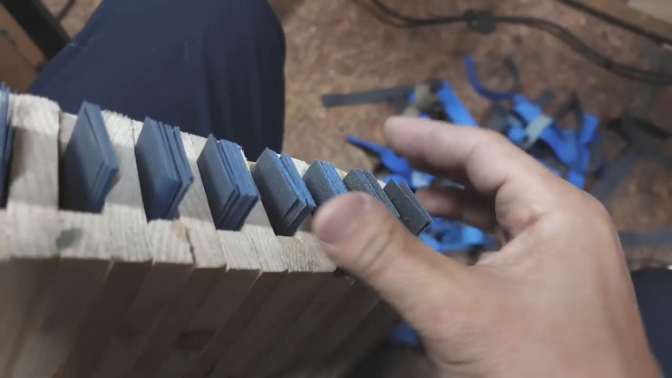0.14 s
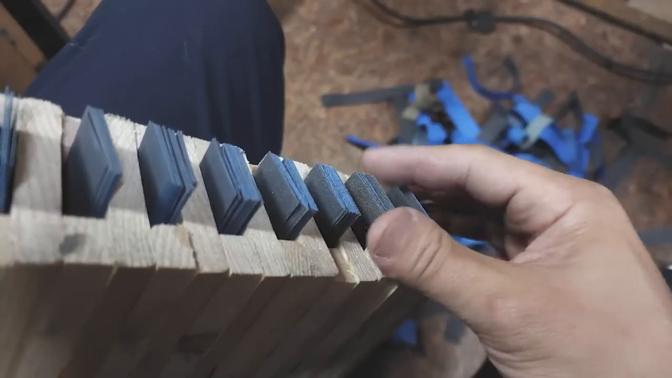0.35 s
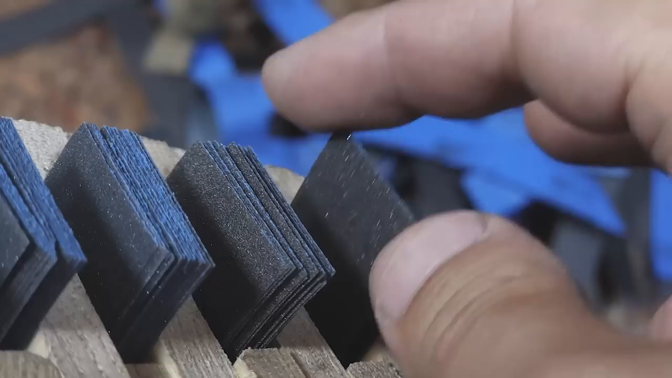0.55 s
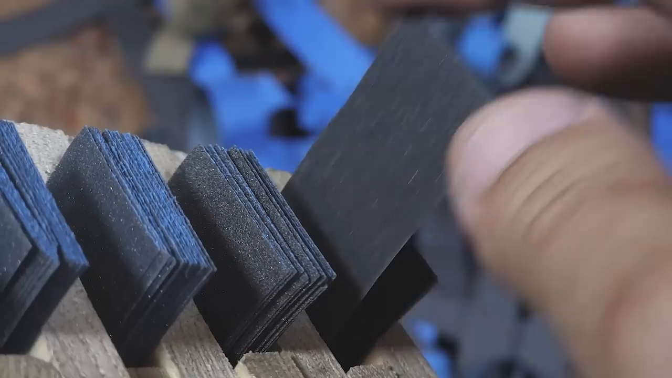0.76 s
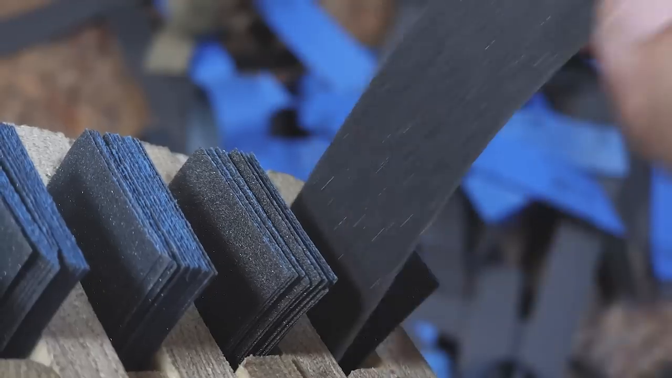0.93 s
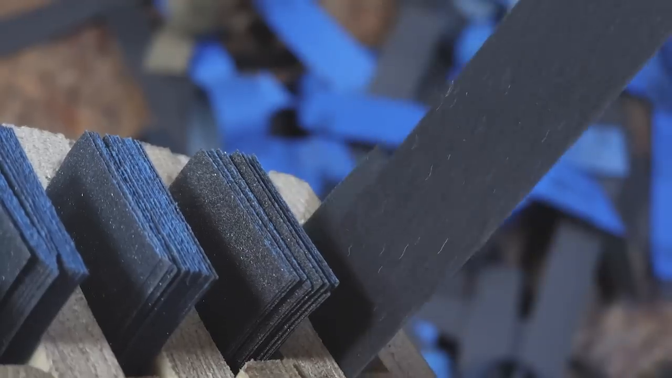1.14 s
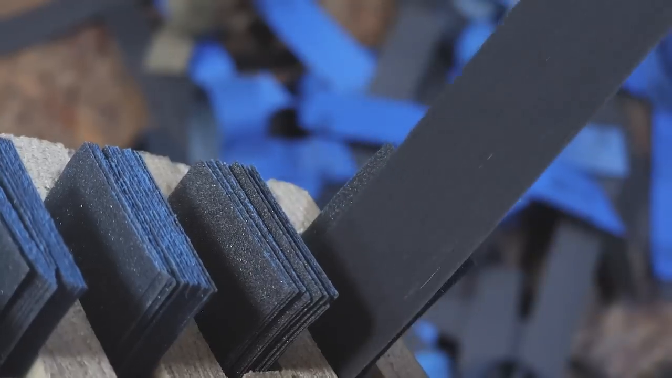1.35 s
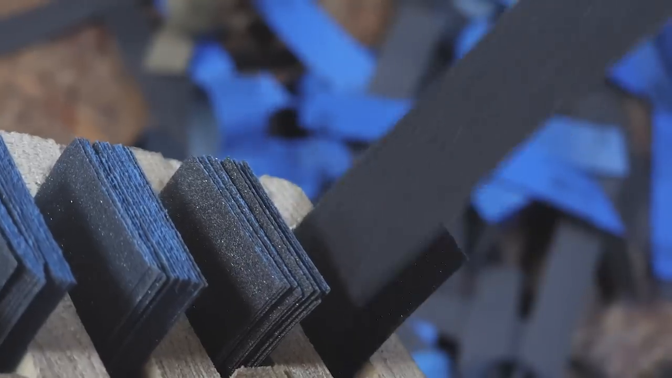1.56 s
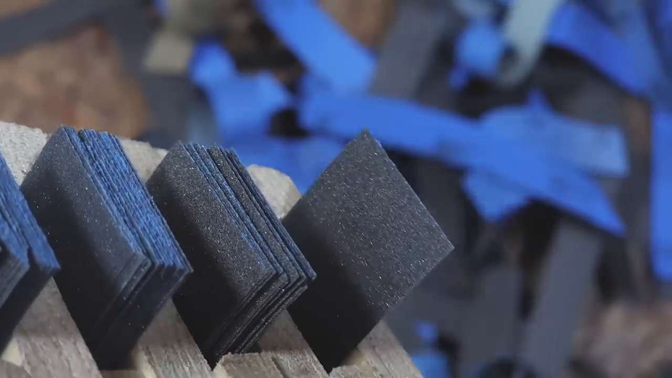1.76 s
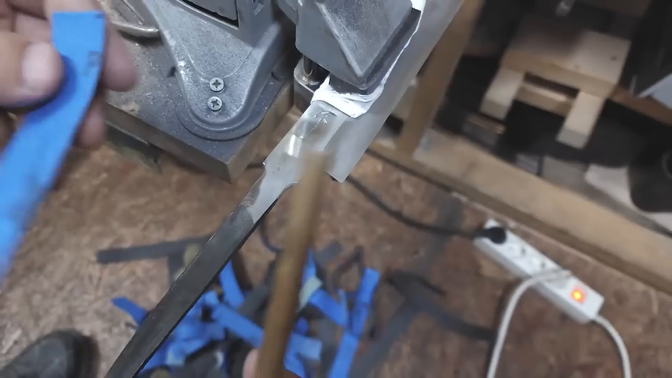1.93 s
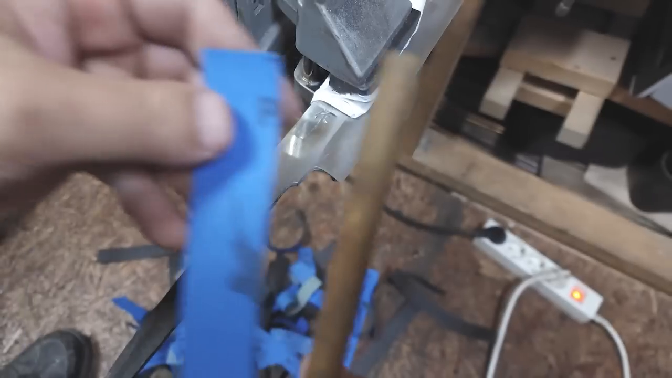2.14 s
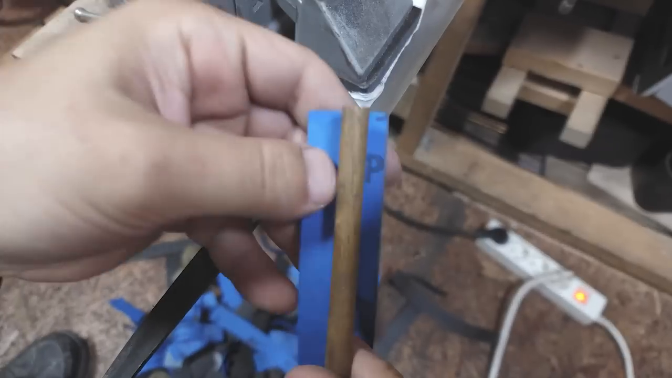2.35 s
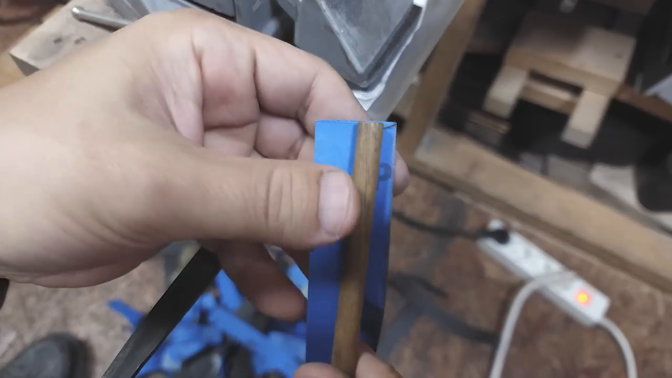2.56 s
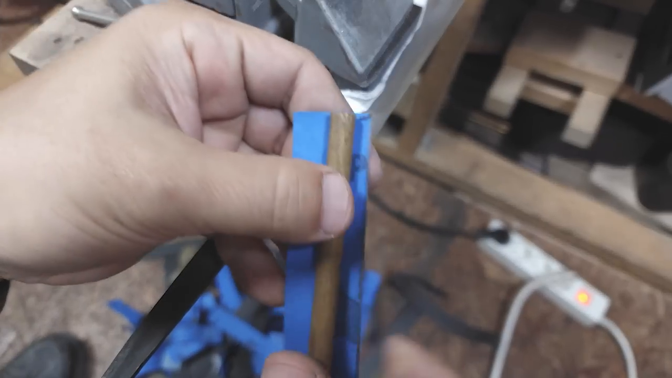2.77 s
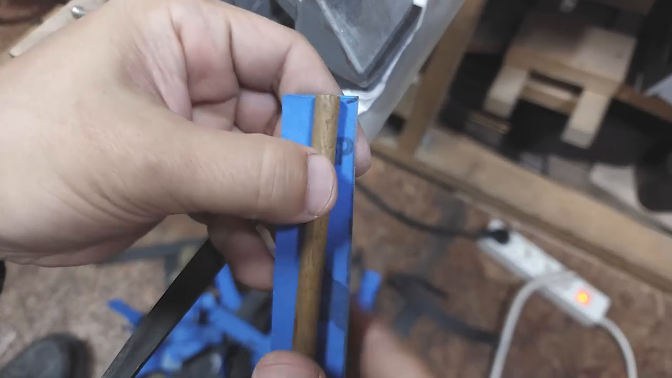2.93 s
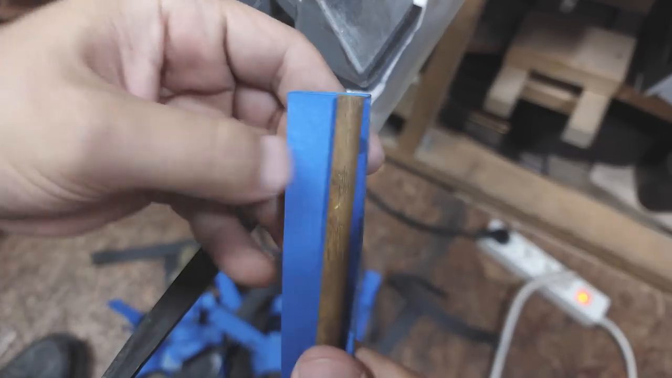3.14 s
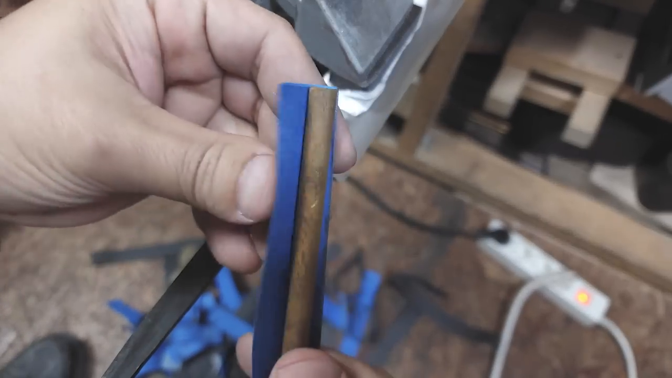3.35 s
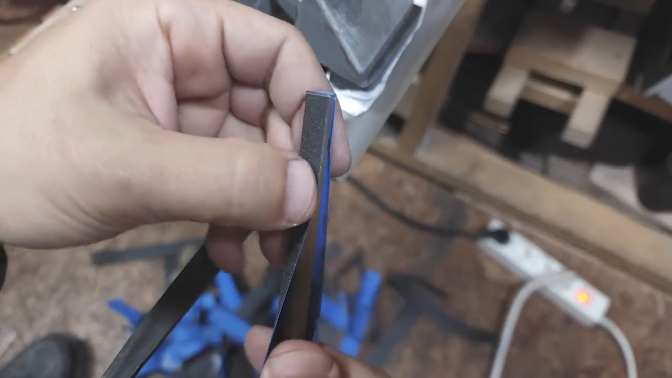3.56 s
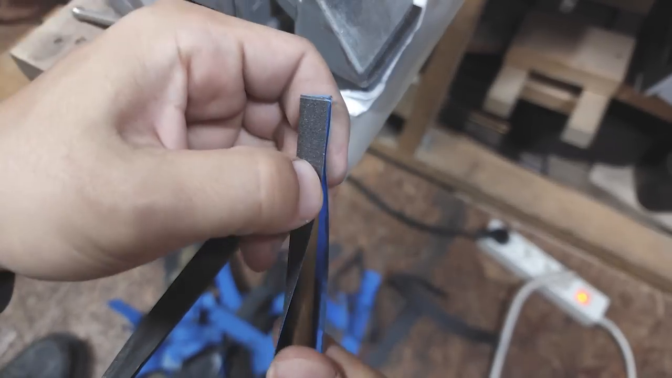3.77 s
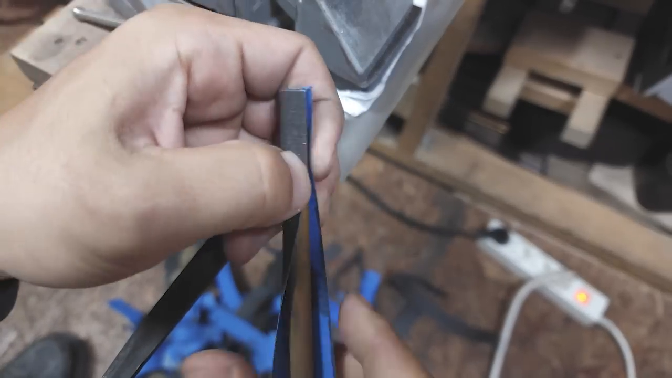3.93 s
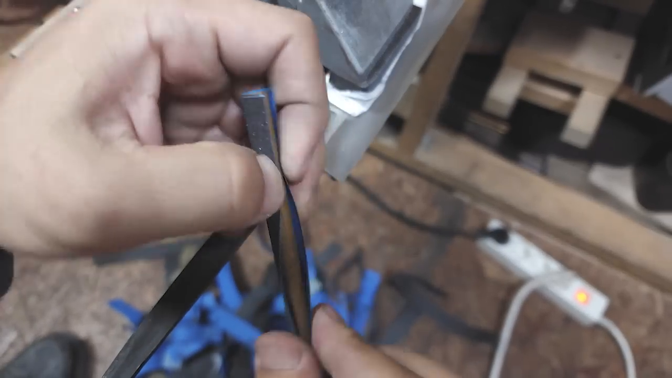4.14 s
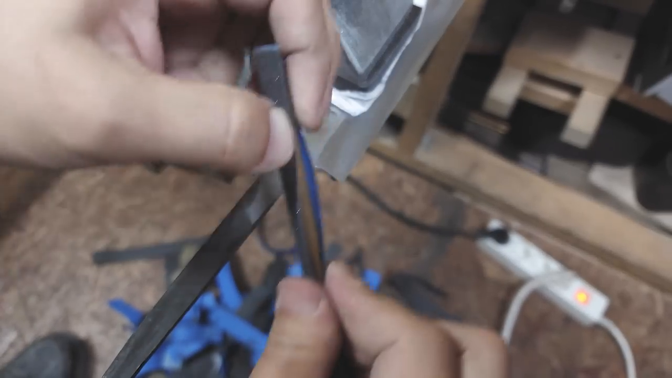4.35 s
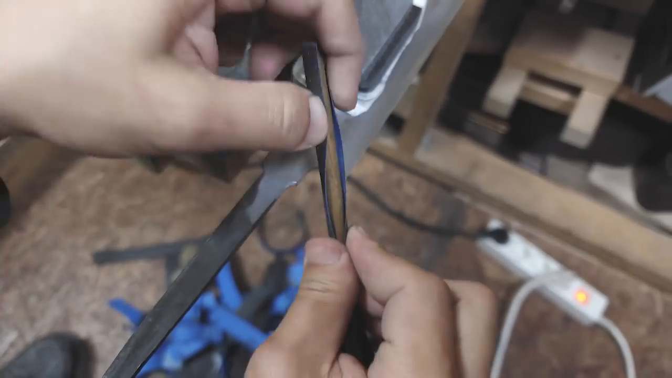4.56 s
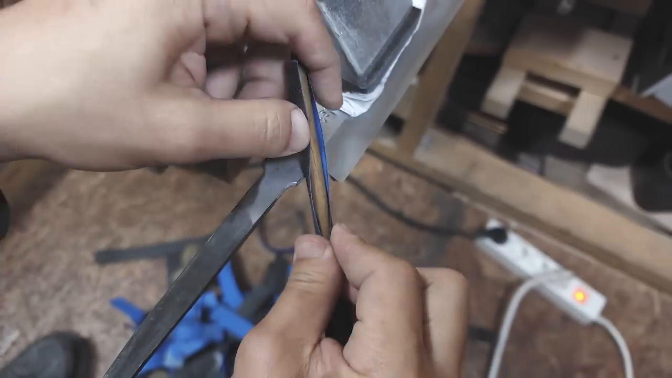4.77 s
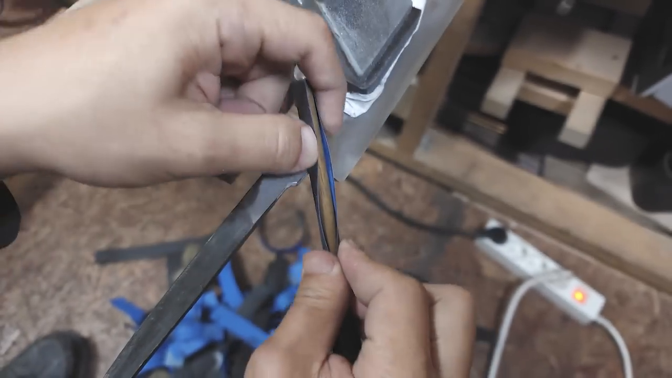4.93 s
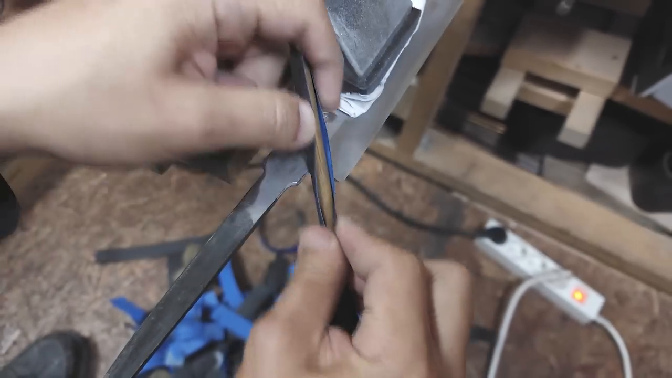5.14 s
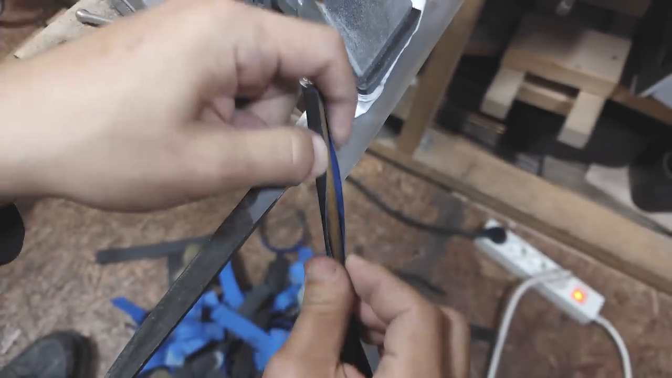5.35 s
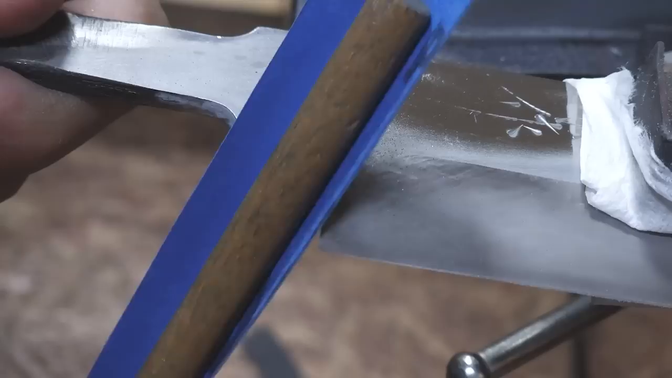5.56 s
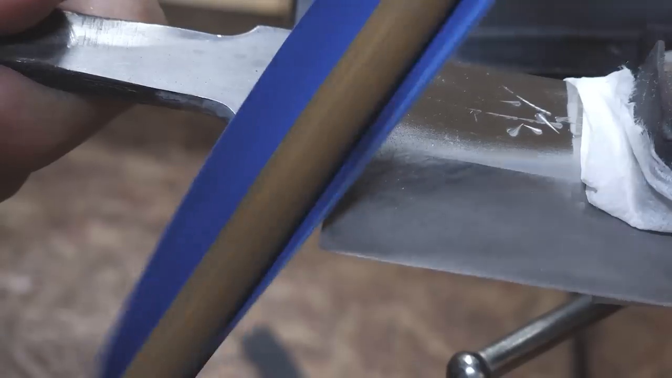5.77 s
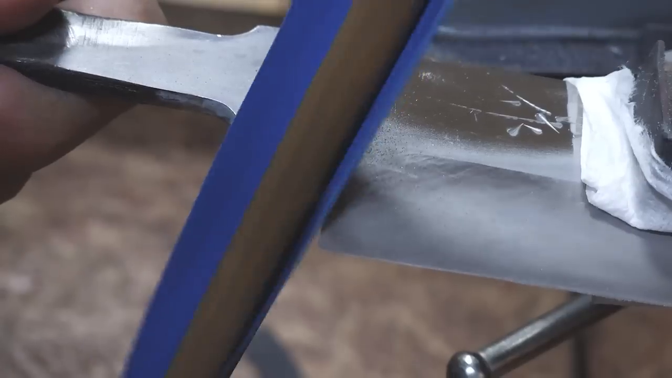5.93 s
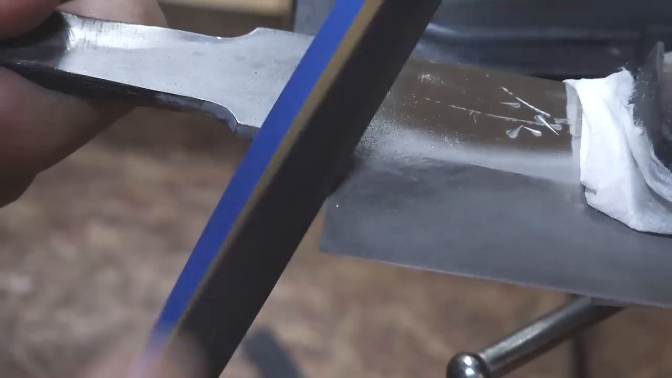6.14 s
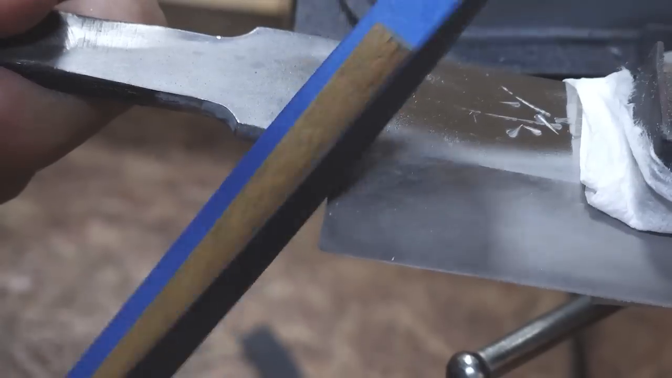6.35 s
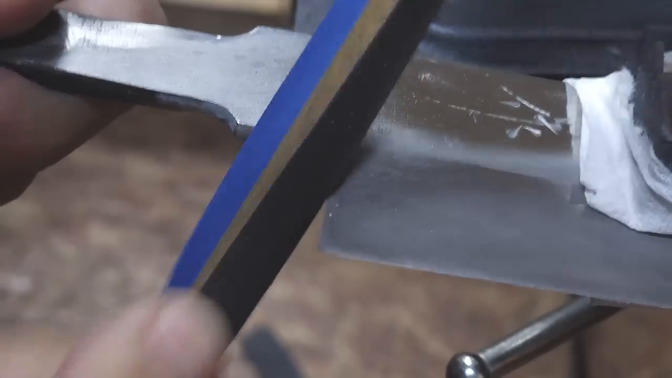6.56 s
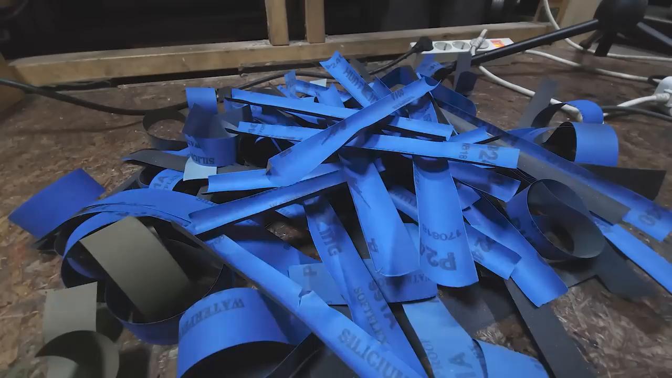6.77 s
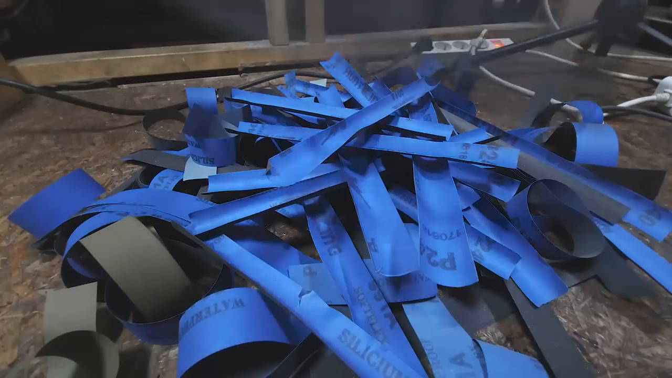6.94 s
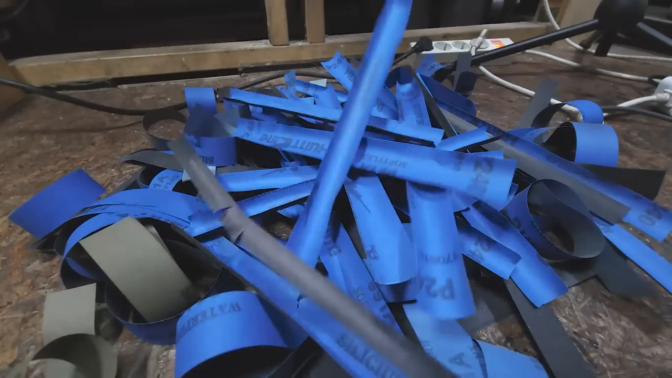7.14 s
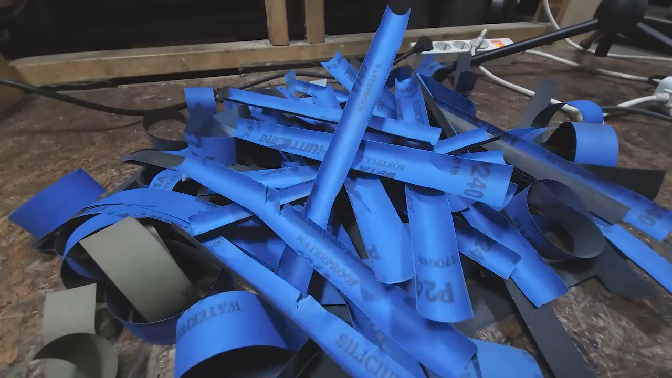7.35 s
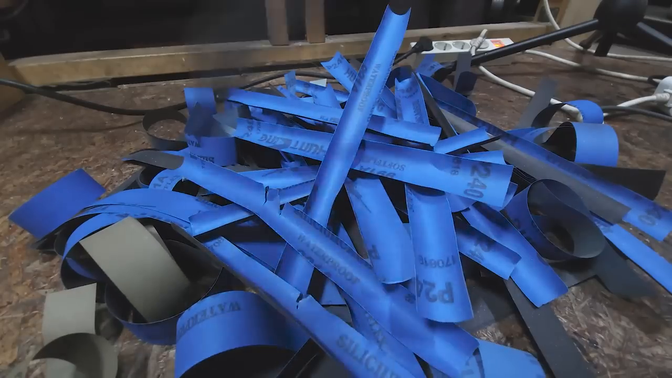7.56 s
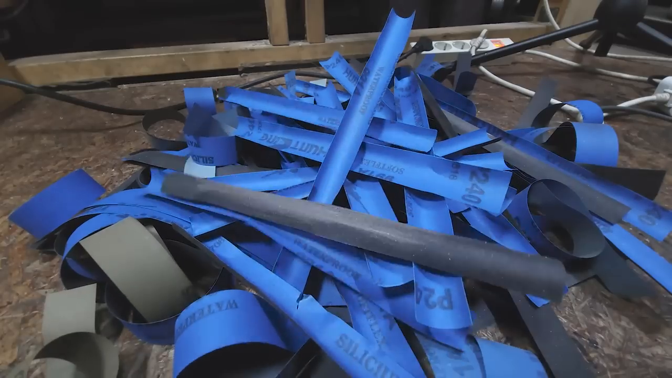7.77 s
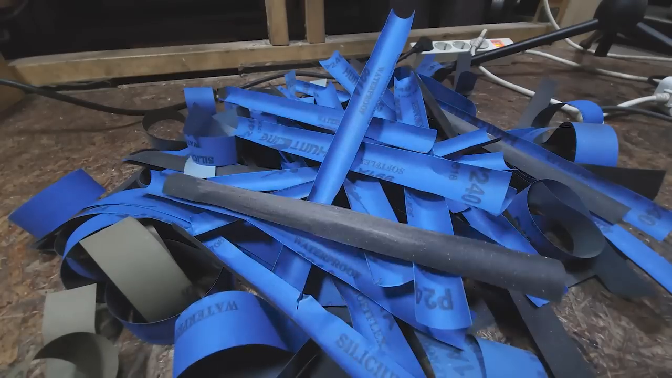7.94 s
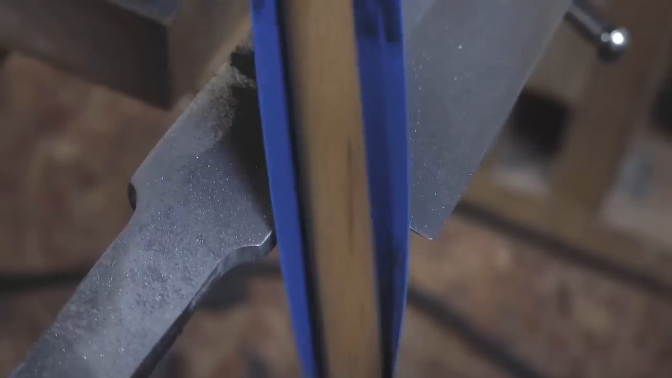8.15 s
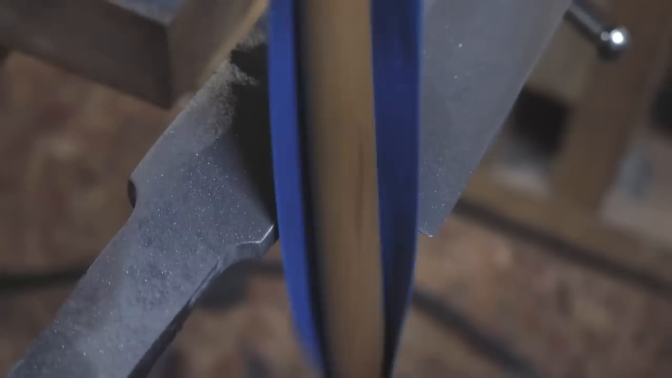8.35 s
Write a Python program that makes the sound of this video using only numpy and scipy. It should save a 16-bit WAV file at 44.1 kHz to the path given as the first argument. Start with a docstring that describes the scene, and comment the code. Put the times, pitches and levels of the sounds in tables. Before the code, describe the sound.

Quiet low room rumble with sandpaper handled very near the microphone: soft rubbing in a wooden rack, a faint airy whistle, small ticks and sharp folds. Slow hissing scrapes make a clamped steel blade ring. They cut to hurried sped-up sanding, like a fluttering high buzz, without the rumble. Strips then land with crackling slaps on a heap, and a few stronger slow scrapes end it.

```python
"""Hand sanding a steel blade

A small workshop, microphone close to the clamped blade. Strips of sandpaper are pulled from a wooden rack, folded
round a stick and rubbed slowly to and fro; then comes sanding played several times too fast, thin and high; spent
strips drop on a heap of paper and slow strokes begin again. Scrape and paper are clumped grain noise shaped by hand
speed; steel and rack are resonances; creases are short cracks. A low room rumble lies under it and falls back
during the fast run.
"""
import sys
import numpy as np
from scipy import signal
from scipy.fft import rfft, irfft, next_fast_len
from scipy.io import wavfile
from scipy.ndimage import uniform_filter1d, map_coordinates

SR = 44100
rng = np.random.default_rng(int(sys.argv[2]) if len(sys.argv) > 2 else 0)


def log_audio(samples):
    """Write samples as a 16-bit WAV file to the path given in sys.argv[1]."""
    # one column per channel
    frames = np.atleast_2d(samples).T
    # limit to full scale, then quantise
    limited = np.clip(frames, -1, 1)
    pcm = np.round(limited * 32767).astype(np.int16)
    wavfile.write(sys.argv[1], SR, pcm)


def gain_from_decibels(decibels):
    """Convert decibel values to linear amplitude factors."""
    exponent = np.asarray(decibels, float) / 20
    return 10 ** exponent


N = 374850

# The fast run is heard between the first two times [s]; slow strokes up to the first and from the last.
QUICK_START, QUICK_END, SLOW_AGAIN = 5.617, 6.746, 8.161


def unit(x):
    """Scaled to rms 1."""
    return x / np.sqrt(np.mean(x ** 2) + 1e-20)


def between(start, end):
    """True from start to end, in seconds."""
    return (np.arange(N) > start * SR) & (np.arange(N) < end * SR)


def curves(rows):
    """One value per sample for each column after time; -120 dB outside the table."""
    s, *cols = np.transpose(rows)
    return [np.interp(np.arange(N) / SR, s, c, -120, -120) for c in cols]


def wobble(rate):
    """A smooth random curve, rate knots a second."""
    knots = rng.standard_normal(int(N * rate / SR) + 4)
    return map_coordinates(knots, [np.arange(N) * rate / SR])


def filtered(x, response):
    """The spectrum of x times a complex response of frequency."""
    m = next_fast_len(N + SR // 2)
    return irfft(rfft(x, m) * response(np.fft.rfftfreq(m, 1 / SR)), m)[:N]


def coloured(x, points):
    """x shaped by (Hz, dB) points, falling steeply past both ends, with its rms kept."""
    below, above = (points[0][0] * .9, -70), (points[-1][0] * 1.05, -70)
    f, db = np.transpose([below, *points, above])
    y = filtered(x, lambda hz: gain_from_decibels(np.interp(np.log(hz + 1), np.log(f), db)))
    return unit(y) * np.sqrt(np.mean(x ** 2))


def ringing(x, modes):
    """x through parallel (Hz, width Hz, dB) resonances of alternating sign, with its rms kept."""
    def response(f):
        return sum((-1) ** k * gain_from_decibels(db) * 1j * f * w / (c * c - f * f + 1j * f * w)
                   for k, (c, w, db) in enumerate(modes))
    return unit(filtered(x, response)) * np.sqrt(np.mean(x ** 2))


def grit(spiky_db, clump_db, clump_rate, patchy_db):
    """Abrasive grains catching: noise whose size jumps from grain to grain, in clumps, its colour shifting in patches."""
    size_db = spiky_db * wobble(2500) + clump_db * wobble(clump_rate)
    grains = rng.standard_normal(N) * gain_from_decibels(size_db)
    z = signal.stft(grains, nperseg=256)[2]
    field = uniform_filter1d(rng.standard_normal(z.shape), size=7, axis=0)  # blurred over frequency
    field = uniform_filter1d(field, size=16, axis=1)  # and over time
    return unit(signal.istft(z * gain_from_decibels(patchy_db * unit(field)), nperseg=256)[1][:N])


def motion(start, end, top):
    """Hand speed 0-1 over one stroke: still at both ends, fastest at the share top of the way from start to end."""
    u = np.clip((np.arange(N) / SR - start) / (end - start), 0, 1)
    top = np.clip(top, .05, .95)
    phase = np.where(u < top, u / top, 1 + (u - top) / (1 - top))
    return np.sin(np.pi * phase / 2).clip(0)


# Two runs of slow strokes on the blade, each stroke lasting until the next starts:
# (start [s], scrape level [dB], blade ring level [dB], moment of top speed [0-1])
STROKES = [
    [(4.883, -30, -41, 0.45), (5.136, -21.5, -42, 0.53), (5.311, -19.5, -37, 0.5), (5.47, -21.5, -43, 0.29)],
    [(8.111, -24, -34, 0.28), (8.214, -22, -35, 0.53), (8.345, -19.5, -34.5, 0.29),
     (8.485, -14.5, -33, 0.35)],
]
# Colour of the slow scrape: (frequency [Hz], level [dB])
SLOW_SCRAPE = [(1530, -50.5), (2900, -12), (3770, -18), (4070, -13), (7650, -4), (9540, -12),
               (14100, -15.5), (16000, -14.5)]
# Blade, stick and vice under the first slow strokes: (frequency [Hz], width [Hz], level [dB])
BLADE = [(158, 16, -0.5), (434, 18, -1.5), (757, 18, 6.5), (500, 920, -15)]
# Blade clamped anew for the last strokes: (frequency [Hz], width [Hz], level [dB])
BLADE_AGAIN = [(424, 18, 3), (917, 11, 0.5), (1194, 20, -3), (2000, 600, -2), (795, 3000, -16)]
# Thin edge of the blade: (frequency [Hz], width [Hz], level [dB])
EDGE = [(1610, 66, 1.5), (1790, 45, 0), (1910, 120, -3), (2137, 55, 0), (2500, 80, -4.5), (2740, 45, -4)]
# The paper bites: the edge sings out just after 5.0 s and fades until 5.5 s:
# (end of fade [s], onset [s], level [dB], moment of most effort, counted back from the end of the fade [0-1])
BITE = (5.5, 5, -30.5, 0.94)


def slow_strokes():
    """Scrape grows steeply with speed; the blade rings from the same grains and carries through the turns."""
    last_stroke_s, overlap_s = 0.15, 0.005  # length of the last stroke of a run; blur at each turn
    catches_per_s, catch_db = 200, 12  # coarse grains catching on the steel
    scrape, ring = np.zeros((2, N))
    for run in STROKES:
        ends = [row[0] for row in run[1:]] + [run[-1][0] + last_stroke_s]
        for (start, db, ring_db, top), end in zip(run, ends):
            end = end + overlap_s
            speed = motion(start, end, top)
            scrape += gain_from_decibels(db) * (speed ** 1.33 + gain_from_decibels(-37.0) * between(start, end))
            ring += gain_from_decibels(ring_db) * (speed ** 0.98 + gain_from_decibels(-19.5) * between(start, end))
    grains = grit(spiky_db=0.5, clump_db=1, clump_rate=90, patchy_db=2.5)
    catches = gain_from_decibels(catch_db) * rng.standard_normal(N) * (rng.random(N) < catches_per_s / SR)
    fade_end, onset, bite_db, bite_top = BITE
    bite = gain_from_decibels(bite_db) * motion(fade_end, onset, bite_top) ** 2  # shape runs backwards: quick rise, long fade
    edge = ringing((gain_from_decibels(-16) * scrape + bite) * grains, EDGE)
    first, last = between(0, QUICK_START), between(SLOW_AGAIN, N)
    blade = ringing(first * ring * grains, BLADE) + first * edge
    blade = blade + last * ringing(last * ring * grains, BLADE_AGAIN)
    return (first | last) * coloured(scrape * (grains + catches), SLOW_SCRAPE) + blade


# Colour of the fast scrape: (frequency [Hz], level [dB])
QUICK_SCRAPE = [(1880, -74), (2900, -21), (3860, -18.5), (4440, -8.5), (7000, -9), (11000, -6), (15800, -2)]
# Blade under the fast strokes: (frequency [Hz], width [Hz], level [dB])
QUICK_BLADE = [(300, 360, -13.5), (1690, 2760, -6.5), (1700, 140, 4)]
# Bright sheen from the blade face: (frequency [Hz], width [Hz], level [dB])
QUICK_SHEEN = [(5750, 490, 1.5), (8320, 600, 0), (11900, 600, 0.5), (13600, 700, 0.5), (15200, 1200, 2)]


def sped_up_strokes():
    """Sanding played several times too fast: short flat-topped strokes with sharp dips at the turns, pushes harder
    than pulls, quickening while softening slightly."""
    strokes, first_s, stroke_s = 27, 5.6, .04454
    hurry_s = .0000473  # each stroke is twice this shorter than the one before
    pause_s = 0.00095  # stillness either side of the far turn
    turn = np.arange(strokes + 1)
    turns = first_s + stroke_s * turn - hurry_s * turn ** 2
    stroke_db = -23.5 + 0.97 * (-1) ** turn - 0.096 * turn
    top = rng.uniform(.5, .9, len(turn))
    speeds = [motion(a + pause_s * (k % 2 == 0), b - pause_s * (k % 2), top[k])
              for k, a, b in zip(turn, turns, turns[1:])]
    # tanh flattens the top of each stroke; a faint scrape carries through the turns
    scrape = sum(gain_from_decibels(db) * np.tanh(2.22 * v) ** 1.28 for db, v in zip(stroke_db, speeds)) + gain_from_decibels(-43.5)
    ring = gain_from_decibels(-42.5) * (sum(speeds) ** 0.57 + gain_from_decibels(-6))
    run = between(QUICK_START, QUICK_END)
    grains = run * grit(spiky_db=2, clump_db=1.6, clump_rate=200, patchy_db=2.2)
    face_grains = run * grit(spiky_db=2.5, clump_db=2, clump_rate=200, patchy_db=2.5)
    sheen = ringing(ringing(scrape * face_grains, QUICK_SHEEN), QUICK_SHEEN)
    blade = ringing(ring * face_grains, QUICK_BLADE)
    # the thin blade tone loses its lows and its treble
    blade = filtered(blade, lambda hz: (hz / (hz + 60)) ** 4 / (1 + (hz / 3200) ** 4))
    return coloured(scrape * grains, QUICK_SCRAPE) + gain_from_decibels(-5) * sheen + blade


# Folds, rubs and strips landing on the heap:
# (start [s], end [s], hiss level [dB], body level [dB], moment of most effort [0-1])
RUSTLES = [(0.01, 0.078, -35.5, -41, 1), (0.13, 0.208, -42.5, -40, 0.72), (1.695, 1.708, -39.5, -45, 0.56),
           (2.1, 2.172, -37.5, -42.5, 0), (2.451, 2.494, -51.5, -53, 0.95), (2.754, 2.827, -50, -67, 0.97),
           (2.941, 2.972, -41, -46.5, 0), (3.092, 3.118, -40, -46, 0.22), (3.127, 3.155, -42.5, -49, 0.05),
           (3.234, 3.303, -54, -64.5, 0.5), (3.325, 3.361, -42, -48.5, 0.47), (3.828, 3.874, -49, -67, 0.5),
           (3.879, 3.937, -31, -38, 0.76), (3.969, 4.002, -31.5, -38.5, 0.19),
           (4.048, 4.115, -43.5, -46.5, 0), (4.162, 4.205, -27, -36.5, 0.52),
           (4.287, 4.335, -38, -40.5, 0.57), (4.837, 4.859, -38, -51, 0.2), (7.03, 7.094, -23, -36, 0.05),
           (7.07, 7.154, -29, -35.5, 0.21), (7.121, 7.198, -29.5, -32.5, 0.73),
           (7.195, 7.259, -30, -36.5, 0.2), (7.354, 7.39, -29.5, -39, 0.21), (7.47, 7.515, -40, -46, 0),
           (7.656, 7.724, -19.5, -29.5, 0.21), (7.759, 7.809, -33.5, -37, 0.26),
           (7.801, 7.877, -39, -48, 0)]
# Colours of the three layers of paper noise: (frequency [Hz], level [dB])
PAPER_BODY = [(250, -18.5), (450, -13.5), (1100, -6), (2400, -1), (3200, -2), (4200, -20)]
PAPER_HISS = [(2800, -34.5), (3800, -7), (6500, -0.5), (16000, -18.5)]
PAPER_SIZZLE = [(8000, 4), (9200, -15), (16000, -16.5)]


def paper():
    """Rustles crackle; the harder the rub, the more sizzle on top; strips landing on the heap slap below."""
    hiss, body = np.zeros((2, N))
    for start, end, db, body_db, top in RUSTLES:
        effort = motion(start, end, top) ** 1.03
        hiss += gain_from_decibels(db) * effort
        body += gain_from_decibels(body_db) * effort
    crackle = grit(spiky_db=3.5, clump_db=4.0, clump_rate=220, patchy_db=4.0)
    sizzle = gain_from_decibels(-3.5) * hiss ** 1.38 * coloured(crackle, PAPER_SIZZLE)
    landing = between(QUICK_END, SLOW_AGAIN)
    slap = gain_from_decibels(2.0) * landing * body ** 1.51 * coloured(crackle, MURMUR)
    return body * coloured(crackle, PAPER_BODY) + hiss * coloured(crackle, PAPER_HISS) + sizzle + slap


# The heap shifting after a strip lands: (start [s], hiss level [dB], fade [dB/s])
SETTLING = [(7.241, -38.5, 393), (7.394, -54.5, 157), (7.717, -39, 173), (7.858, -60.5, 18)]


def heap():
    """Level of the paper heap: each landing leaves it shifting, fading at its own speed to a faint rest."""
    still_db = -75.5
    t = np.arange(N) / SR
    shifting = sum((t > start) * gain_from_decibels(db - fade * (t - start).clip(0)) for start, db, fade in SETTLING)
    return (shifting + gain_from_decibels(still_db)) * between(QUICK_END, SLOW_AGAIN)


# Strips sliding in their rack slots: (time [s], hiss level [dB], body level [dB])
PULL = [(0, -52.5, -45), (0.34, -60.5, -64), (0.43, -50.5, -58), (0.55, -59.5, -65), (0.63, -73, -73),
        (0.87, -63, -53), (1.15, -46, -50.5), (1.3, -63.5, -67.5), (1.47, -42.5, -55), (1.665, -36.5, -49),
        (1.685, -73, -71), (1.86, -73, -88)]
# Wooden rack, low and high resonances: (frequency [Hz], width [Hz], level [dB])
RACK_BODY = [(418, 120, -4.5), (1280, 650, -4), (2125, 200, 3), (3050, 560, -5)]
RACK_HISS = [(5125, 920, -0.5), (5910, 640, 3.5), (6680, 1090, -2)]
# Fingers smoothing paper round the stick: (time [s], hiss level [dB])
FINGERS = [(1.858, -58.5), (2.0, -63), (2.15, -58), (2.3, -61.5), (2.54, -79), (3.1, -64), (3.45, -71.5),
           (3.8, -67.5), (3.98, -53.5), (4.4, -63.5), (4.83, -65.5)]


def slides():
    """Even rubbing: strips in their slots sound through the wooden rack; fingers and the heap whisper."""
    fingers_body_db, heap_body_db = -4.5, -6.5  # body relative to hiss
    slide = grit(spiky_db=2.5, clump_db=2.0, clump_rate=49, patchy_db=3.0)
    hiss, body = gain_from_decibels(curves(PULL))
    # reversed grains keep the rack's hiss independent of its body
    rack = body * ringing(slide, RACK_BODY) + hiss * ringing(ringing(slide[::-1], RACK_HISS), RACK_HISS)
    rack = rack + gain_from_decibels(-2.5) * hiss * coloured(slide, PAPER_HISS)
    fingers, shifting = gain_from_decibels(curves(FINGERS)[0]), heap()
    soft = grit(spiky_db=-0.5, clump_db=2.0, clump_rate=97, patchy_db=3.5)
    low_level = gain_from_decibels(fingers_body_db) * fingers + gain_from_decibels(heap_body_db) * shifting
    low = low_level * coloured(soft, PAPER_BODY)
    sizzle = gain_from_decibels(-8.5) * (hiss + fingers + shifting) ** 1.187 * coloured(soft, PAPER_SIZZLE)
    return rack + low + (fingers + shifting) * coloured(soft, PAPER_HISS) + sizzle


# Single sharp cracks: creases snapping, and a coarse grain catching on the steel at 5.32 s:
# (time [s], relative level [dB])
CRACKS = [(2.4742, -32), (4.3131, -22), (4.8858, -28.5), (5.3203, -15), (7.0454, -10.5), (7.0718, -6.5),
          (7.656, -12), (7.6757, -17), (7.8211, -17.5)]


def cracks():
    """A crease gives way or a grain catches: a crack of a few milliseconds; abrupt rustles open with one, and bent
    paper ticks at random."""
    ticks_per_s, tick_db, tick_spread_db = 24, 17, 5  # tick level over the fingers' rubbing, give or take the spread
    openers = [(start, db + 11.5) for start, _, db, _, top in RUSTLES if top < .2]
    fingers_db, = curves(FINGERS)
    ticks = []
    for u, v in rng.random((int(ticks_per_s * N / SR), 2)):
        place = u * (N - 1)
        ticks.append((place / SR, fingers_db[int(place)] + tick_db + tick_spread_db * (2 * v - 1)))
    crack, t = np.zeros(N + SR), np.arange(SR // 20) / SR
    for s, db in list(CRACKS) + openers + ticks:
        crack[round(s * SR):][:len(t)] += gain_from_decibels(db - 4.0 - 60 * t / 0.015)  # falls 60 dB in 15 ms
    noise = rng.standard_normal(N)
    return crack[:N] * (coloured(noise, PAPER_HISS) + gain_from_decibels(-13.0) * coloured(noise, PAPER_BODY))


# Airy tones of a strip on the stick: (frequency [Hz], width [Hz], level [dB])
WHISTLE = [(2745, 21, 7.5), (5160, 200, -2), (8100, 350, -2.5), (11300, 450, -4), (14700, 500, -11)]


def whistle():
    """A thin airy whistle, noise through narrow resonances, while a strip slides along the stick."""
    glide = motion(1.91, 2.085, 1.0) ** 1.1 + gain_from_decibels(-13) * motion(2.16, 2.26, 0.5) ** 0.55
    return gain_from_decibels(-53.5) * glide * ringing(rng.standard_normal(N), WHISTLE)


def thump():
    """The stick is set against the blade with a dull low knock: a decaying 151 Hz tone with a soft onset."""
    t = (np.arange(N) / SR - 4.612).clip(0)
    tone = np.sin(2 * np.pi * 151 * t)
    onset = 1 - np.exp(-t / 0.0059)
    return gain_from_decibels(-31.5 - 60 * t / 0.15) * onset * tone


def walls(x):
    """A short diffuse answer from bench and walls: noise falling 60 dB in 0.16 s, 200 samples late."""
    t = np.arange(SR // 3) / SR
    tail = rng.standard_normal(len(t)) * gain_from_decibels(-60 * t / 0.16)
    return signal.fftconvolve(np.pad(x, (200, 0)), tail / np.linalg.norm(tail))[:N]


# Background of the workshop: (time [s], relative rumble level [dB], relative murmur level [dB])
ROOM = [(0, -67.5, -78), (0.62, -67.5, -67), (1.85, -68.5, -67.5), (1.88, -62.5, -57), (2.6, -64.5, -73.5),
        (4.2, -68.5, -76.5), (4.6, -67, -60), (5.615, -60, -50.5), (5.63, -85, -66.5), (6.74, -88.5, -64),
        (6.755, -66, -72.5), (8.49, -65.5, -71.5)]
# Colour of the low rumble: (frequency [Hz], level [dB])
RUMBLE = [(22, -37), (40, 2), (55, -11.5), (150, -9), (200, -29.5)]
# Two wavering hums in the rumble: (frequency [Hz], width [Hz], level [dB])
HUMS = [(70.9, 8.7, -1.5), (118.2, 8.6, -3)]
# Colour of the dull murmur, also of the slap of landing strips: (frequency [Hz], level [dB])
MURMUR = [(120, -9), (200, -4), (450, -12.5), (1200, -31.5), (16000, -46.5)]


def room():
    """Lumpy rumble with two wavering hums, and a dull murmur above it, all from filtered noise."""
    rumble_db, murmur_db = curves(ROOM)
    hums = ringing(ringing(rng.standard_normal(N), HUMS), HUMS)
    rumble = coloured(rng.standard_normal(N), RUMBLE) + gain_from_decibels(2.5) * hums
    rumble = gain_from_decibels(rumble_db - 0.5 + 1.5 * wobble(5.5)) * rumble
    murmur = gain_from_decibels(murmur_db + 2.7 * wobble(7.1)) * coloured(rng.standard_normal(N), MURMUR)
    return rumble + murmur


def scene():
    """Everything near the microphone, the echo of paper and cracks, and the room."""
    handling = paper() + slides() + cracks()
    near = handling + gain_from_decibels(-14.0) * walls(handling) + whistle() + thump()
    return (near + slow_strokes() + sped_up_strokes() + room())[None]


def low_pass(x):
    """Removes everything above the highest recorded frequency."""
    return signal.sosfilt(signal.butter(12, 16970, fs=SR, output="sos"), x)


def record(dry):
    """The microphone path passes about 35 Hz to 16 kHz."""
    kept = filtered(dry[0], lambda hz: gain_from_decibels(np.interp(hz, [15, 38, 15700, 16050], [-34.5, 0, -0.5, -69])))
    return low_pass(kept[None])


dry = scene()
out = record(dry)
log_audio(out)
```